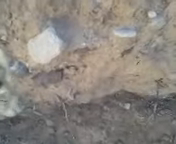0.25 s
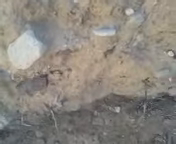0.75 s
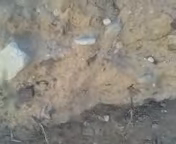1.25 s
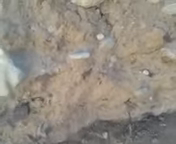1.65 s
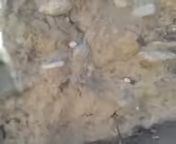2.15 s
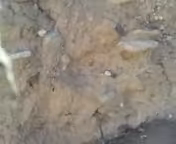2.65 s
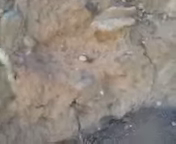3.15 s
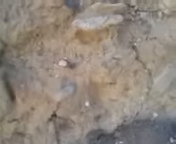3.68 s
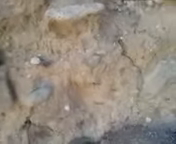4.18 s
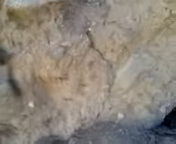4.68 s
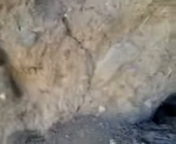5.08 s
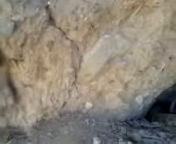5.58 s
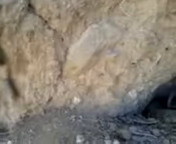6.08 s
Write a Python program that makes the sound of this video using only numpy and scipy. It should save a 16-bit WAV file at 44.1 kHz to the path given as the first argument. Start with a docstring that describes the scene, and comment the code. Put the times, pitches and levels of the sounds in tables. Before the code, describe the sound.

A rattlesnake buzzes its tail continuously among rocks, growing louder as someone edges closer with faint scuffing steps.

```python
"""A rattlesnake buzzes its tail among rocks at the foot of an earth bank.
Each shake, about 65 a second, makes the loose, hollow tail segments scrape, clack together
and fall nearly still. The buzz grows louder as someone edges closer with a hand-held microphone.
Under it lie scuffing feet, a few gravel crunches, soft bumps of the hand and faint background noise."""
import sys
import numpy as np
from scipy import signal
from scipy.fft import rfft, irfft, next_fast_len
from scipy.io import wavfile
from scipy.ndimage import uniform_filter1d

SR = 44100
rng = np.random.default_rng(int(sys.argv[2]) if len(sys.argv) > 2 else 0)


def unload_audio(sound):
    """Save the sound as a 16-bit wav file, at the path given as the first command line argument."""
    columns = np.transpose(np.atleast_2d(sound))
    # keep every value between -1 and 1, then stretch to whole-number steps
    steps = np.round(np.clip(columns, -1, 1) * 32767)
    wavfile.write(sys.argv[1], SR, steps.astype(np.int16))


N = 279153
TIME = np.arange(N) / SR

# how hard the segments slide, with a lull as the tail turns: (point in the stroke [0-1], force [dB])
SLIDING = [(0.02, 1.5), (.09, -1.5), (.2, 1), (0.3, -0.5), (.39, -2), (.46, -3), (0.522, -10), (.63, -9.5),
           (0.72, -6.5), (.8, -.5), (.93, -1.5)]
# the segments clack in turn, the large low ones first:
# (pitch [Hz], width [Hz], level [dB], point in the stroke [0-1], extra force of the clack [dB])
SEGMENTS = [(3000, 1900, -4, .16, 4.5), (3880, 1000, -2.5, .17, 6), (6650, 1200, -0.5, 0.36, 5.5),
            (7070, 1200, -4.5, .3, 5.5), (7600, 910, 0.5, .32, 9), (8750, 420, -2, .335, 10),
            (9700, 1100, 2, .34, 9), (10300, 1400, -6.5, 0.33, 5), (12400, 1500, -5.5, 0.36, 8.5)]
# the tail shakes harder or slackens: (time [s], level change [dB], half length [s])
SURGES = [(0.255, 1.6, 0.058), (.55, -0.5, 0.032), (0.937, 1, 0.052), (1.792, -1.3, 0.03),
          (3.377, 0.5, 0.016), (3.416, -1, 0.017), (3.958, 0.5, 0.021), (5.882, 0, .07)]
# tone of the hollow segments from three places along the bank: (frequency [Hz], level [dB])
FAR_TONE = [(1060, -62), (1800, -22), (2240, -33.5), (2610, -16.5), (3250, -25), (3530, -18.5),
            (4230, -18.5), (5030, -10), (5610, -12.5), (6600, -5.5), (8360, -1.5), (9940, -11.5),
            (12600, -19), (15100, -17), (15800, -13)]
MIDWAY_TONE = [(1060, -47), (1800, -14), (2100, -30.5), (2430, -14), (4040, -15), (4630, -12), (5120, -5.5),
               (5970, -7), (7360, 0), (8060, -6.5), (8670, 1.5), (9760, -1.5), (10800, -10.5), (11500, -10),
               (13300, -12.5), (15800, -17)]
NEAR_TONE = [(760, -49), (1300, -20.5), (1930, -21.5), (2730, -13.5), (3510, -16), (4020, -7),
             (4560, -11.5), (4850, -8), (5270, -7), (7370, 1), (8440, -2), (9770, -1.5), (11200, -7.5),
             (11900, -8), (12800, -15), (14400, -10), (15800, -12.5)]
# when the microphone is at each place: (time [s])
PLACE_TIMES = [0.11, 2.57, 5.2]
# share of smeared, steady hiss, strongest in the high treble:
# (frequency [Hz], level against the pulsing buzz [dB])
SMEAR_SHARE = [(2500, -6), (5000, -3), (9500, -23.5), (12500, 1.5), (16000, -10.5)]
# narrow dips in the tone, at times peaks: (width [Hz], five frequencies [Hz], five level changes [dB])
DIPS = [(69, 3000, 3400, 3000, 3500, 3550, -3, -6, -1, -3.5, -18),
        (110, 5450, 5600, 5750, 6500, 6050, -5, -2, -3, -1.5, -2.5),
        (102.3, 4250, 4230, 4300, 4200, 4800, -15, -14, -5, -7.5, 5.5),
        (120, 4780, 4780, 4710, 4740, 4890, -8, -9, -21, -21, -27),
        (199, 7660, 7250, 14000, 8800, 8800, -4, -2, -4, 1, -6.5),
        (156, 11000, 10600, 10850, 10850, 21000, -8, -8, 1, -3, -6.5),
        (221, 12300, 11000, 12150, 11000, 9800, 2, -1, -2, -6.5, 1.5)]
# the moments those five values belong to: (time [s])
DIP_TIMES = [.4, 1.6, 3.0, 4.5, 5.7]
# the hardest single clacks: (time [s], peak level [dB], pitch [Hz])
HARD_CLACKS = [(0.906, -28, 8600), (2.151, -30, 9450), (2.2922, -27, 8850), (2.544, -30, 9300),
               (2.924, -23.5, 8600), (3.272, -23, 8400), (3.3036, -23, 8500), (3.891, -25, 9500),
               (3.9694, -18.5, 7600), (5.194, -20, 7800), (5.0272, -26, 11550), (5.0576, -22, 11800),
               (5.148, -20, 9700), (5.3309, -17.5, 9860), (5.3618, -26, 11950), (5.5446, -32, 10300)]
# soles scuffing, and one short rough burst near 3.05 s: (time [s], level [dB], half length # [s])
SCUFFS = [(0.177, -57, 0.0043), (0.244, -66, .003), (0.265, -55, 0.0023), (1.832, -59, 0.0056),
          (1.845, -62, .003), (1.885, -57.5, 0.014), (1.918, -63.5, 0.0089), (2.016, -63, .005),
          (2.066, -61, 0.011), (2.13, -62.5, 0.012), (3.056, -62, 0.004), (3.422, -68.5, 0.018),
          (3.795, -67.5, 0.019)]
# tone of the scuffed dirt: (frequency [Hz], level [dB])
DIRT_TONE = [(70, 3), (170, 9.5), (450, 9.5), (900, 5), (1600, 0), (3000, -63)]
# pebbles knocking, the larger ones lower: (time [s], peak level [dB], pitch multiplier [ratio])
KNOCKS = [(0.174, -54.5, .36), (1.827, -52, .42), (1.882, -51, .48), (3.051, -34, 1)]
# the notes a pebble rings with: (base pitch [Hz], level [dB], time to fade by 60 dB [s])
PEBBLE_NOTES = [(453, -26, 0.011), (634, 6.5, 0.028), (915, -6, .016), (1130, 11, 0.03), (1300, -11, 0.016),
                (1730, -6, 0.016)]
# gravel crunches (loud rows), soft blips (faint rows): (time [s], level [dB], half length [s], pitch [Hz])
CRUNCHES_AND_BLIPS = [(2.994, -59.5, 0.004, 770), (3.64, -89, 0.0071, 750), (4.474, -88, 0.01, 950),
                      (4.525, -64.5, 0.0073, 800), (4.714, -71, 0.012, 1200), (4.849, -67.5, 0.013, 1190),
                      (4.938, -55.5, 0.0046, 1220), (4.971, -72.5, 0.0088, 540)]
# bumps of the hand: (time [s], peak level [dB], half length [s])
BUMPS = [(.005, -49, 0.0071), (0.036, -43.5, 0.0034), (0.115, -51, 0.0036), (2.416, -44.5, 0.0028),
         (2.443, -47, 0.0049), (3.177, -52, 0.0027), (3.528, -43, 0.0023), (3.562, -51, 0.0049),
         (3.737, -50, 0.0045), (4.261, -51, 0.0042), (4.297, -52, 0.0067)]
# low rumble of the hand-held microphone: (frequency [Hz], level [dB])
RUMBLE_TONE = [(15, -9.5), (34, 5), (48, -4.5), (100, -11.5), (180, -16), (300, -27.5), (600, -60)]
# the grip shifts softly: (time [s], extra rumble [dB], half length [s])
GRIPS = [(1.71, 5, 0.081), (2.99, 3.5, 0.29), (3.638, 6, 0.16), (5, 3, 0.1), (5.877, 5.5, 0.073)]
# tone of the background hiss: (frequency [Hz], level [dB])
HISS_TONE = [(20, -3), (60, -15), (130, -3.5), (250, -6.5), (450, -8.5), (950, -13.5), (2000, -12.5),
             (4000, -24.5)]
# tone of the faint, flickering background noise: (frequency [Hz], level [dB])
FLICKER_TONE = [(150, -16), (350, 1.5), (650, -28), (1200, 8.5), (1700, -2), (3000, -27)]


def rattle(level_db=-30.5, scrape_db=-5, low_cut_hz=1500, shimmer_db=0.7, sizzle_db=1.4):
    """The segments click and scrape, and their hollow shape colours the buzz."""
    clicks = collisions()
    # the segments rub for about a millisecond around each collision
    rubbing = np.sqrt(abs(uniform_filter1d(clicks ** 2, size=45)))
    scrape = treble(rubbing * rng.standard_normal(N))
    source = normalize(clicks + gain(scrape_db) * scrape)
    hz, t, pulsing = flat_spectra(source)
    _, _, smeared = flat_spectra(smear(source))
    smear_gain = gain(level_at(SMEAR_SHARE, hz))[:, None]
    spectra = (pulsing + smear_gain * smeared) / np.sqrt(1 + smear_gain ** 2)
    # the tone blends from one place to the next
    tone_db = sum(np.outer(level_at(tone, hz), np.interp(t, PLACE_TIMES, weight))
                  for tone, weight in zip((FAR_TONE, MIDWAY_TONE, NEAR_TONE), np.eye(3)))
    # narrow peaks and dips come and go, most of all in the high treble
    patches = uniform_filter1d(rng.standard_normal(spectra.shape), size=24)
    flicker_db = shimmer_db + sizzle_db * ramp(9500, 2000, hz)[:, None]
    tone_db += flicker_db * normalize(uniform_filter1d(patches, size=2, axis=0))
    # so small a body gives off almost no bass
    bass_cut = (hz ** 2 / (hz ** 2 + low_cut_hz ** 2))[:, None] ** 2
    buzz = signal.istft(spectra * gain(tone_db) * bass_cut, nperseg=512, noverlap=384)[1][:N]
    # the muscles put the same power into every few strokes
    steady = buzz / np.sqrt(uniform_filter1d(buzz ** 2, size=4100))
    surge_db = sum(db * swell(at, half) for at, db, half in SURGES)
    distance_m, _ = approach()
    return shifting_dips(steady) * gain(level_db + surge_db) / distance_m


def tail_strokes(pace_hz=63.01, burst_hz=3.83, tiring_s=0.95, alarm_hz=2.74):
    """Counts the strokes so far: the tail starts fast, tires, then speeds up as the person nears."""
    per_s = pace_hz + burst_hz * np.exp(-TIME / tiring_s) + alarm_hz * ramp(3.85, 0.65)
    lost = 0.45 * ramp(1.56, 0.06)  # the tail catches once and loses part of a stroke
    return 0.06 + np.cumsum(per_s) / SR - lost


def collisions(base_per_s=40000, spread_db=1.4, tick_db=-4, crowding=0.48):
    """Tiny hits make each loose segment tick and ring; their number and force follow the stroke."""
    strokes = tail_strokes()
    slide_at, slide_db = np.transpose(SLIDING)
    stroke_number = (strokes + 0.5).astype(int)  # a new stroke begins in the lull
    strokes = strokes + 0.008 * wander(65)  # slightly uneven timing
    out = np.zeros(N)
    for hz, width, db, clack_at, clack_db in SEGMENTS:
        phase = (strokes + 0.009 * wander(65)) % 1
        # each segment clacks harder or softer from stroke to stroke
        strength = 1 + 0.12 * np.clip(rng.standard_normal(N), -2, 1)[stroke_number]
        clack_shape = np.exp(-((phase - clack_at) / 0.055) ** 2 / 2)
        force_db = np.interp(phase, slide_at, slide_db, period=1) + clack_db * strength * clack_shape
        # the crowding share of the force makes more hits, the rest makes harder ones
        hit = rng.random(N) < gain(crowding * force_db) ** 2 * base_per_s / len(SEGMENTS) / SR
        size = gain((1 - crowding) * force_db + spread_db * np.clip(rng.standard_normal(N), -2, 2))
        clicks = hit * size * rng.choice([-1, 1], N)
        out += gain(db) * (gain(tick_db) * treble(clicks) + ring(clicks, hz, width))
    return normalize(out)


def smear(x, fade_s=0.052, delay_s=0.0016, count=90):
    """Blurs the pulses into a steady hiss by giving each click a short, ever-changing noisy tail."""
    t = np.arange(SR // 12) / SR
    patterns = rng.standard_normal((count, len(t))) * gain(-60 * t / fade_s) * (t >= delay_s)
    place = np.linspace(0, count - 1, N)
    out = np.zeros(N)
    for k, pattern in enumerate(patterns):
        near = np.arange(*np.searchsorted(place, [k - 1, k + 1]))
        blend = np.cos(np.pi / 2 * (place[near] - k))
        out[near] += signal.fftconvolve(x[near], normalize(pattern))[:len(near)] * blend
    return normalize(out)


def shifting_dips(x, drift_hz=32, changes_per_s=8):
    """Narrow dips in the buzz shift as the microphone moves, and waver with the unsteady hand."""
    hz, t, spectra = signal.stft(x, SR, nperseg=2048, noverlap=1536)
    for width, *path in DIPS:
        centre_hz = np.interp(t, DIP_TIMES, path[:5])
        centre_hz += drift_hz * np.interp(t, TIME, wander(changes_per_s))
        depth_db = np.interp(t, DIP_TIMES, path[5:])
        depth_db *= np.exp(0.3 * np.interp(t, TIME, wander(changes_per_s)))
        spectra *= gain(depth_db * np.exp(-((hz[:, None] - centre_hz) / width) ** 2))
    return signal.istft(spectra, nperseg=2048, noverlap=1536)[1][:N]


def hard_clacks(half_s=0.0013, width_hz=2200, tick_db=-9, low_cut_hz=5200):
    """Now and then a segment slams home: a tight cluster of hits rings it much harder than usual."""
    t = np.arange(SR // 50) / SR
    lead = len(t) // 2
    out = np.zeros(N)
    for at, db, hz in HARD_CLACKS:
        blow = rng.standard_normal(len(t)) * swell(lead / SR, half_s, t)
        ringing = ring(ring(blow, hz, width_hz), hz, width_hz)
        clack = normalize(ringing + gain(tick_db) * treble(blow))
        clack = treble(treble(clack, low_cut_hz), low_cut_hz)  # a clack has no bass
        out[round(at * SR) - lead:][:len(t)] += gain(db) * clack / abs(clack).max()
    return out


def scuffs(catch_db=3.5, catches_per_s=260):
    """Soles catch and slip on the dirt, making short bursts of rough noise."""
    catching = normalize(gain(catch_db * np.minimum(wander(catches_per_s), 2)))
    return noise(DIRT_TONE) * catching * sum(gain(db) * swell(at, half) for at, db, half in SCUFFS)


def pebbles(grit_s=0.0071, grit_amount=0.45, low_cut_hz=60):
    """Gritty pebbles knock together underfoot and ring briefly."""
    t = np.arange(SR // 8) / SR
    bass_cut = signal.butter(4, low_cut_hz, "high", fs=SR, output="sos")
    out = np.zeros(N)
    for at, peak_db, pitch in KNOCKS:
        ringing = sum(gain(db - 60 * t / fade_s) * np.sin(2 * np.pi * hz * pitch * t)
                      for hz, db, fade_s in PEBBLE_NOTES)
        grit = rng.standard_normal(len(t)) * np.exp(-t / grit_s) / np.sqrt(grit_s * SR / 2)
        blow = (t == 0) + grit_amount * grit  # one sharp tap, then a short scratch
        knock = signal.sosfilt(bass_cut, np.convolve(blow, ringing)[:len(t)])
        out[round(at * SR):][:len(t)] += gain(peak_db) * knock / abs(knock).max()
    return out


def crunches_and_blips(grains_per_s=4000, width_hz=420):
    """Short grainy bursts: the louder ones are gravel underfoot, the faint ones just soft blips."""
    grains = (rng.random(N) < grains_per_s / SR) * rng.standard_normal(N)
    return sum(gain(db) * swell(at, half) * ring(ring(grains, hz, width_hz), hz, width_hz)
               for at, db, half, hz in CRUNCHES_AND_BLIPS)


def hand_bumps():
    """Each bump of the hand pushes the microphone one way and back."""
    out = np.zeros(N)
    for at, db, half in BUMPS:
        offset = (TIME - at) / half
        out += gain(db) * offset * np.exp((1 - offset ** 2) / 2)
    return out


def hand_rumble(rest_db=-68, moving_db=2.5, sway_db=1.5):
    """The hand makes a low rumble that grows when it moves faster or shifts its grip."""
    _, speed = approach()
    grip_db = sum(db * swell(at, half) for at, db, half in GRIPS)
    return noise(RUMBLE_TONE) * gain(rest_db + moving_db * speed + grip_db + sway_db * wander(6.6))


def background_hiss(start_db=-67, drop_from_s=2.46, drop_db_per_s=20, floor_db=-110, waver_db=1.5):
    """A faint, slightly uneven hiss that fades away from about 2.5 s on."""
    level_db = np.maximum(start_db - drop_db_per_s * np.maximum(TIME - drop_from_s, 0), floor_db)
    return noise(HISS_TONE) * gain(level_db + waver_db * wander(29.65))


def background_flicker(level_db=-86.5, flicker_db=7, patches_per_s=22):
    """Faint background noise flickers in short patches, slowly rising and then falling away."""
    _, rise_and_fall = approach()
    patches = gain(level_db + flicker_db * np.minimum(wander(patches_per_s), 1.5))
    return noise(FLICKER_TONE) * patches * rise_and_fall


def approach(start_s=0.95, end_s=6.08, far_m=2.637, near_m=0.93):
    """One smooth move towards the snake: gives the distance [m] and the speed [0-1]."""
    angle = np.pi * ramp(start_s, end_s - start_s)
    return near_m + (far_m - near_m) * (1 + np.cos(angle)) / 2, np.sin(angle)


def gain(db):
    """Turns decibels into a multiplier."""
    return 10 ** (np.asarray(db) / 20)


def normalize(x):
    """Scales a signal to an average power of 1."""
    return x / np.sqrt(np.mean(x ** 2) + 1e-20)


def swell(at, half, t=TIME):
    """A smooth rise and fall of height 1 around the given moment."""
    return np.exp(-((t - at) / half) ** 2 / 2)


def ramp(start, length, t=TIME):
    """Rises evenly from 0 to 1."""
    return np.clip((t - start) / length, 0, 1)


def wander(per_s):
    """A random curve that heads for a new value per_s times a second."""
    return normalize(np.interp(TIME * per_s, np.arange(N), rng.standard_normal(N)))


def treble(x, cut_hz=5000):
    """Keeps the high part of a sound, at power 1."""
    return normalize(signal.lfilter(*signal.butter(2, cut_hz, "high", fs=SR), x))


def ring(x, hz, width_hz):
    """Makes a sound ring at one pitch, at power 1; a narrower width rings longer."""
    decay = np.exp(-np.pi * width_hz / SR)
    feedback = [1, -2 * decay * np.cos(2 * np.pi * hz / SR), decay * decay]
    return normalize(signal.lfilter([1, 0, -1], feedback, x))


def level_at(tone, hz):
    """Looks up a table's level [dB] at the given frequencies."""
    table_hz, db = np.transpose(tone)
    return np.interp(np.log(hz + 1), np.log(table_hz + 1), db)


def noise(tone):
    """Noise shaped by a tone table, at power 1."""
    size = next_fast_len(N)
    hz = np.fft.rfftfreq(size, 1 / SR)
    spectrum = rfft(rng.standard_normal(size)) * gain(level_at(tone, hz))
    return normalize(irfft(spectrum, size)[:N])


def flat_spectra(x):
    """Splits short slices of a sound into frequencies and evens out its overall tone."""
    hz, t, spectra = signal.stft(x, SR, nperseg=512, noverlap=384)
    broad_power = uniform_filter1d(np.mean(abs(spectra) ** 2, 1), size=15)
    return hz, t, spectra / np.sqrt(broad_power)[:, None]


def scene():
    """The snake, the person edging closer and the faint background, in one channel."""
    snake = rattle() + hard_clacks()
    quiet_sounds = background_hiss() + hand_rumble() + hand_bumps() + scuffs() + pebbles()
    return (snake + quiet_sounds + crunches_and_blips() + background_flicker())[None]


def record(dry, top_hz=15800):
    """Cuts away the very highest treble."""
    low_pass = signal.firwin(511, top_hz, window=("kaiser", 9), fs=SR)
    return signal.oaconvolve(dry, low_pass[None], "same")


dry = scene()
out = record(dry)
unload_audio(out)
```